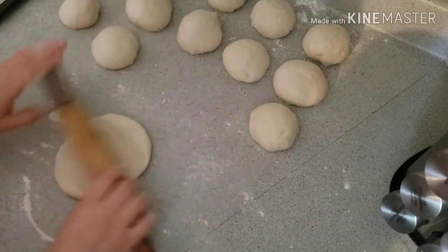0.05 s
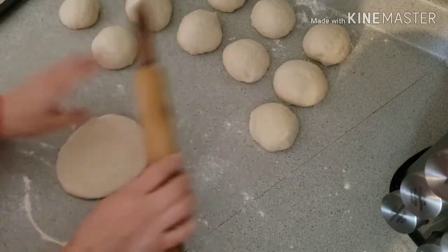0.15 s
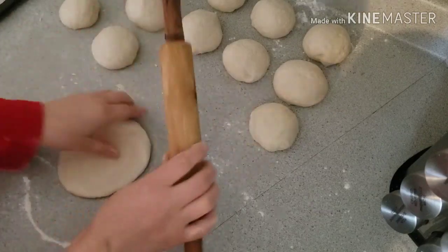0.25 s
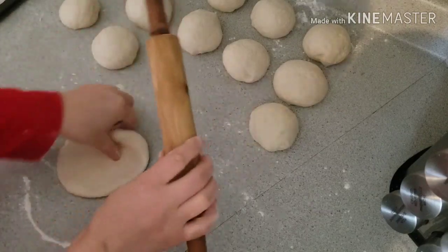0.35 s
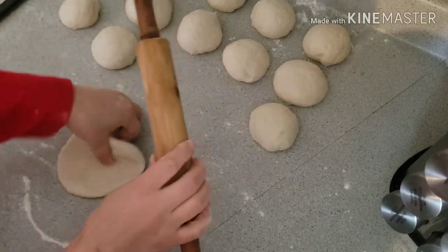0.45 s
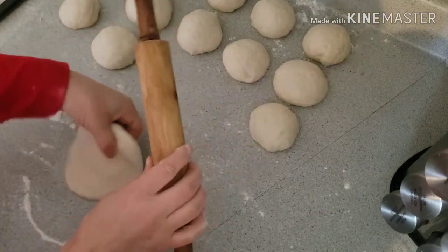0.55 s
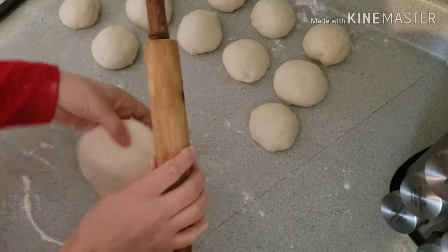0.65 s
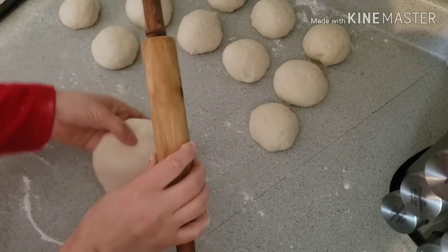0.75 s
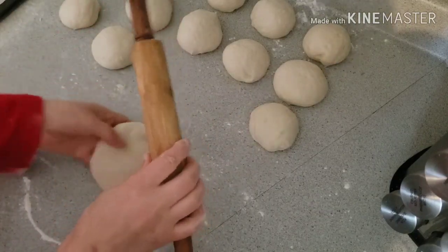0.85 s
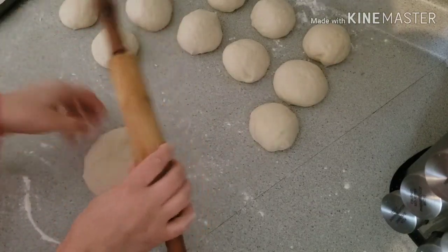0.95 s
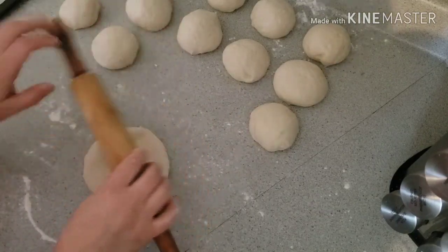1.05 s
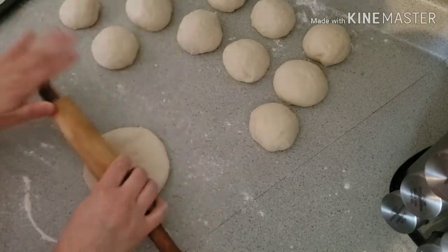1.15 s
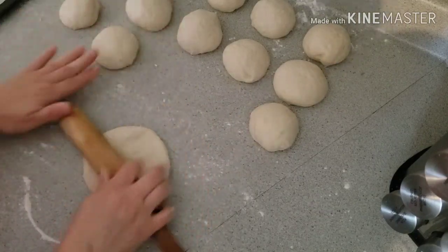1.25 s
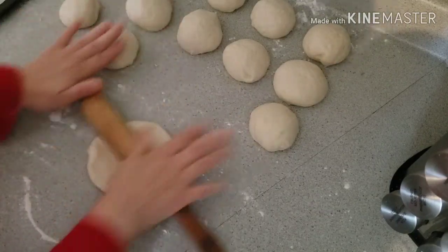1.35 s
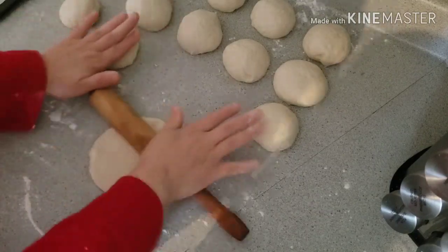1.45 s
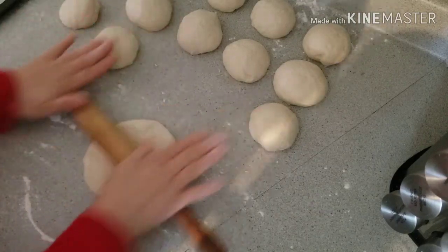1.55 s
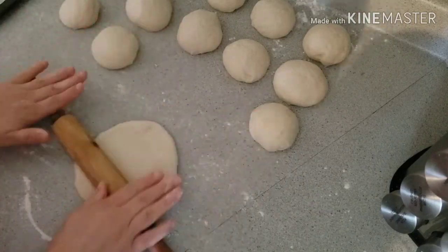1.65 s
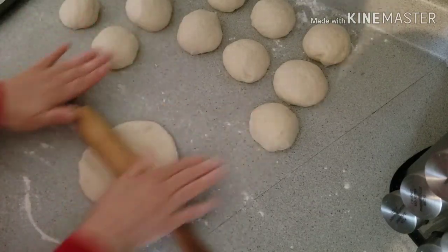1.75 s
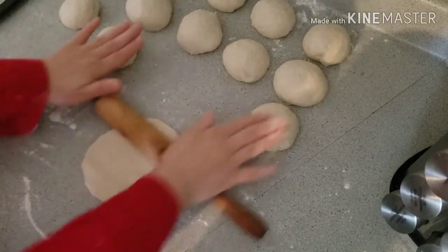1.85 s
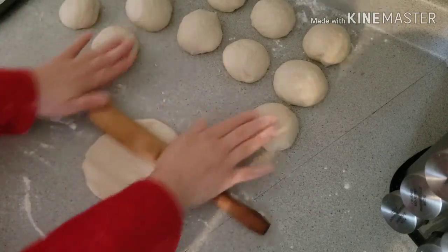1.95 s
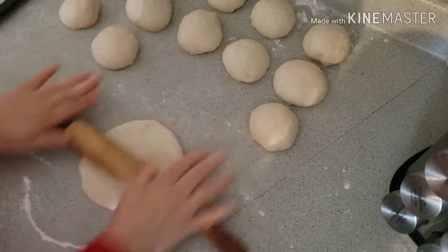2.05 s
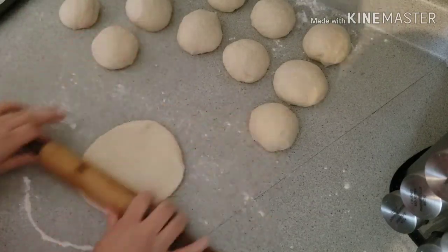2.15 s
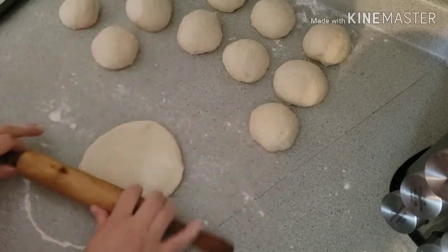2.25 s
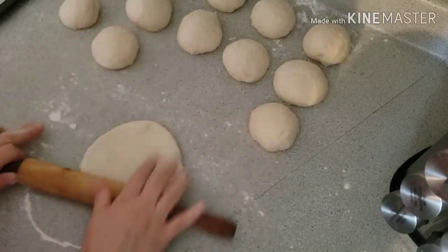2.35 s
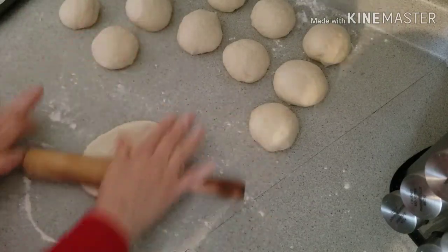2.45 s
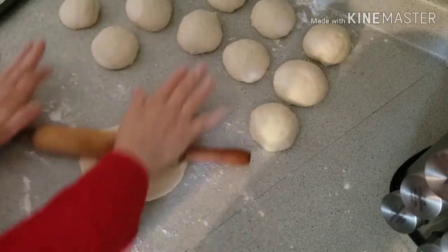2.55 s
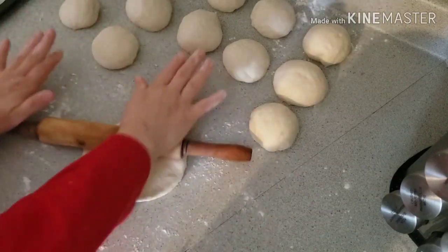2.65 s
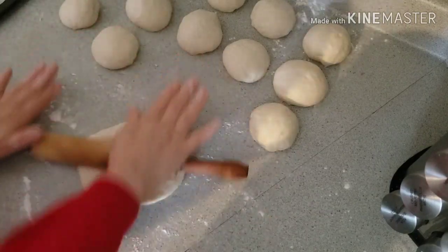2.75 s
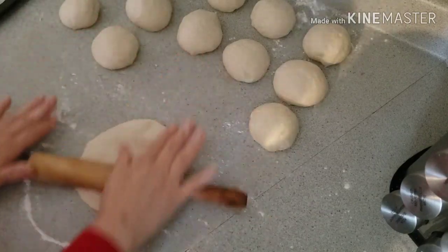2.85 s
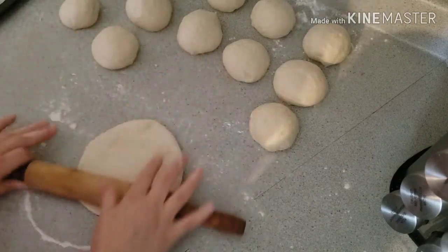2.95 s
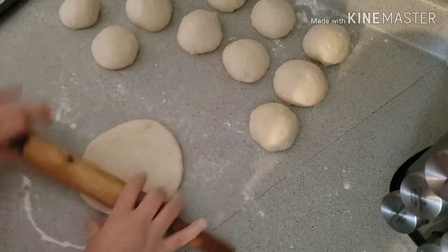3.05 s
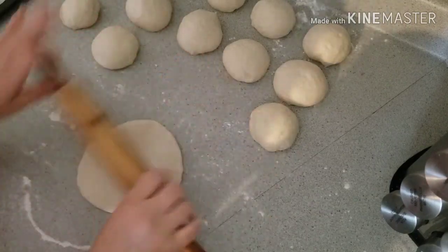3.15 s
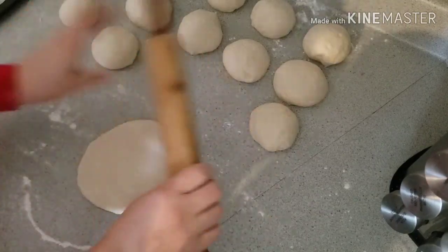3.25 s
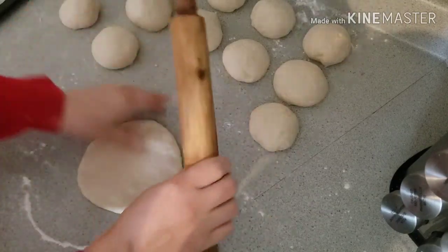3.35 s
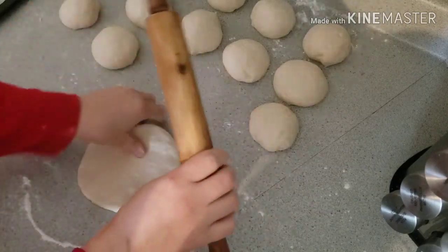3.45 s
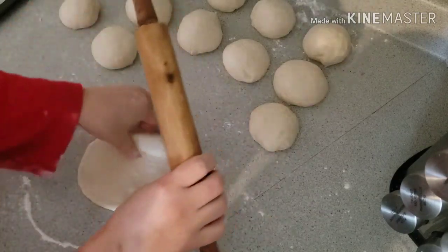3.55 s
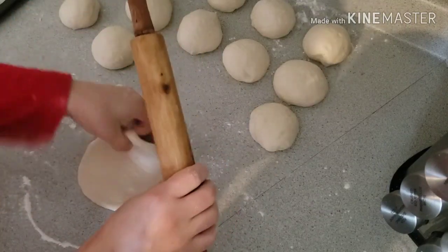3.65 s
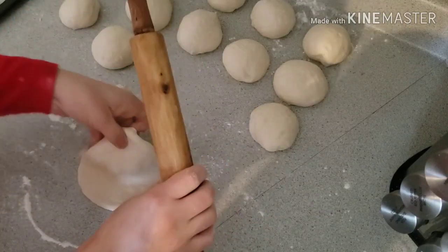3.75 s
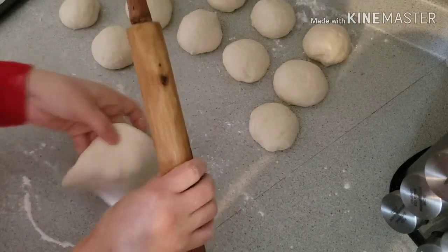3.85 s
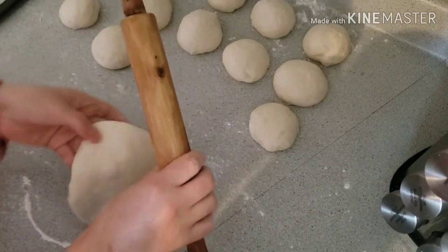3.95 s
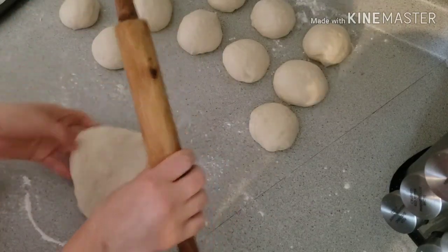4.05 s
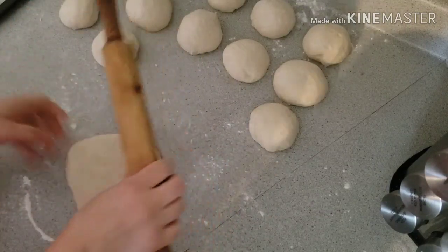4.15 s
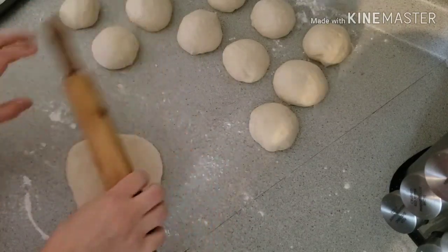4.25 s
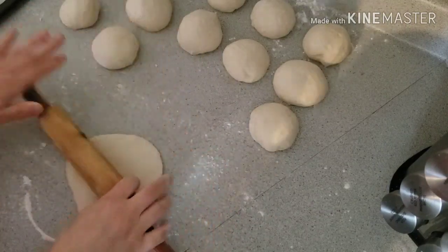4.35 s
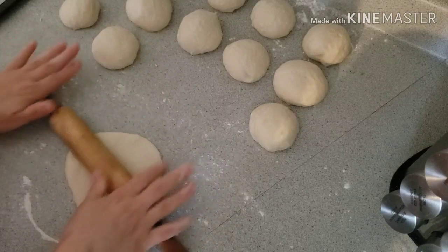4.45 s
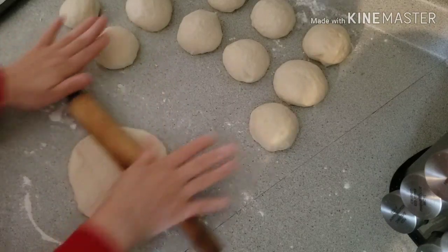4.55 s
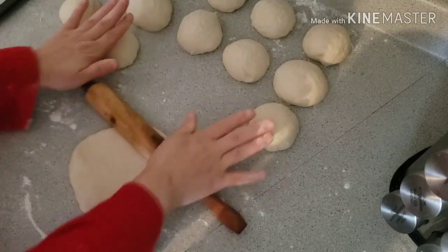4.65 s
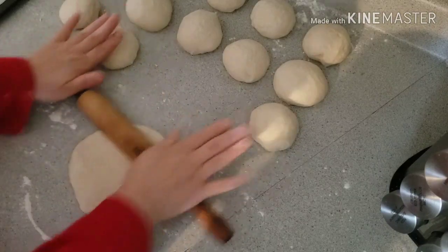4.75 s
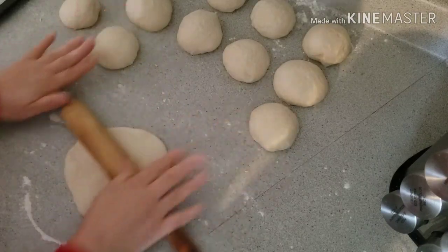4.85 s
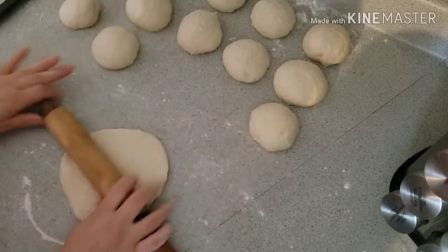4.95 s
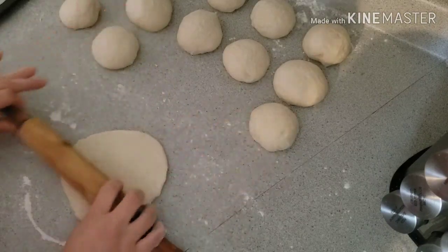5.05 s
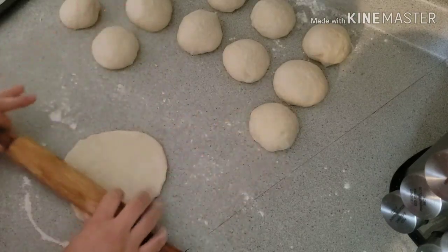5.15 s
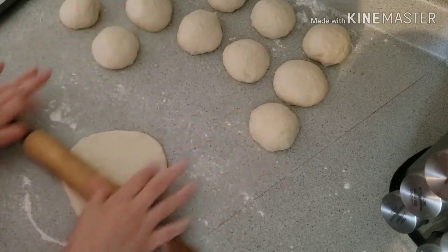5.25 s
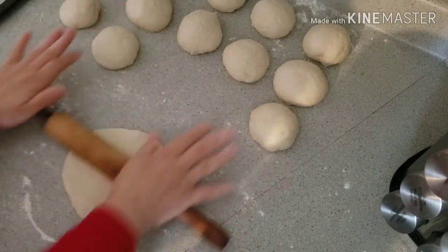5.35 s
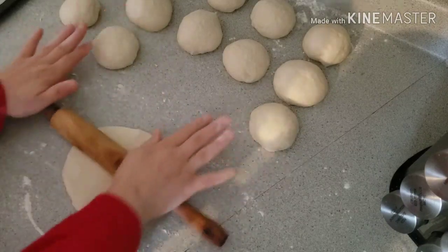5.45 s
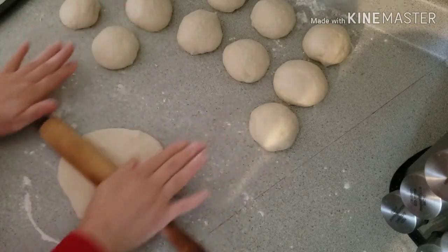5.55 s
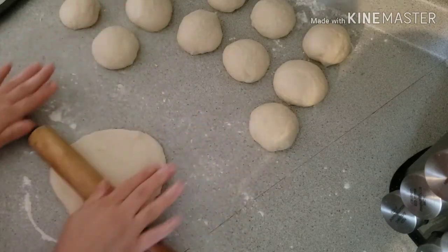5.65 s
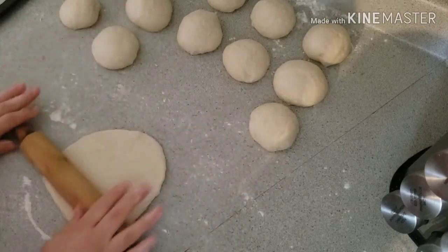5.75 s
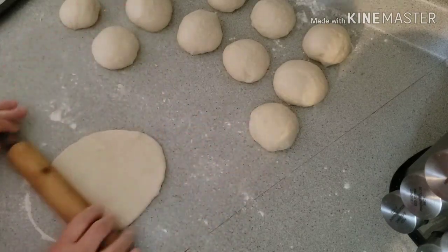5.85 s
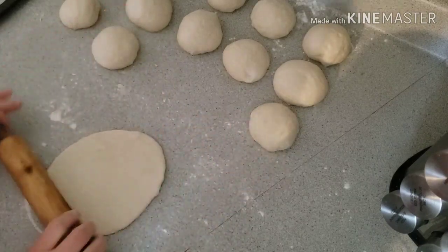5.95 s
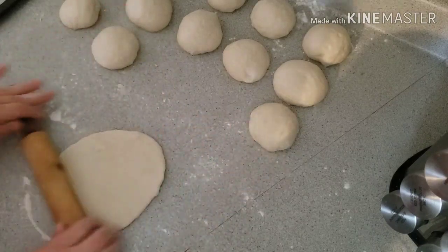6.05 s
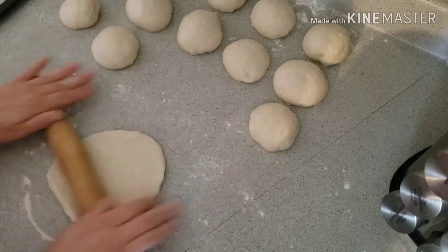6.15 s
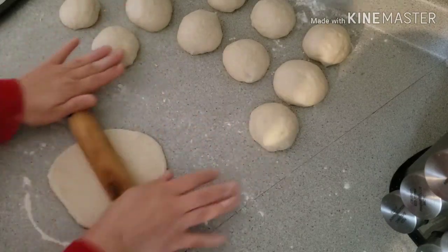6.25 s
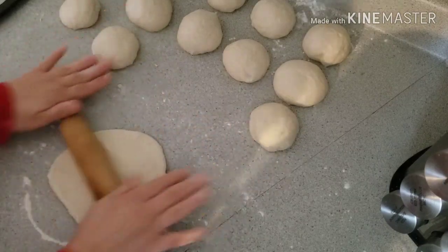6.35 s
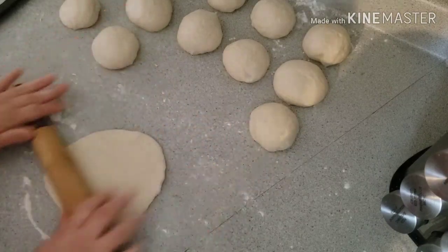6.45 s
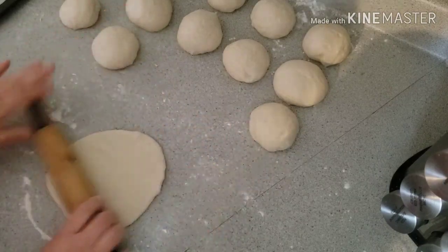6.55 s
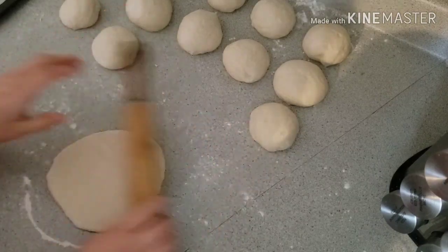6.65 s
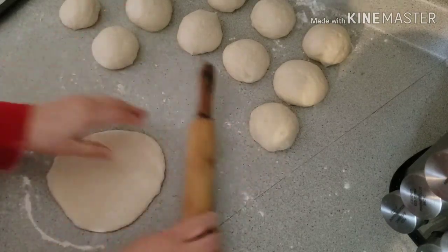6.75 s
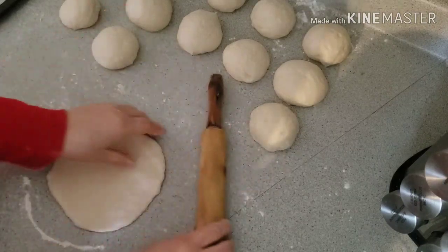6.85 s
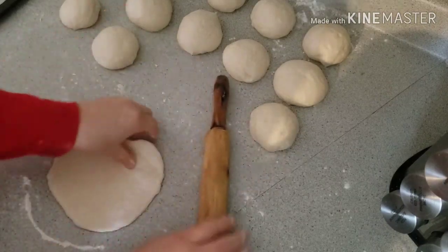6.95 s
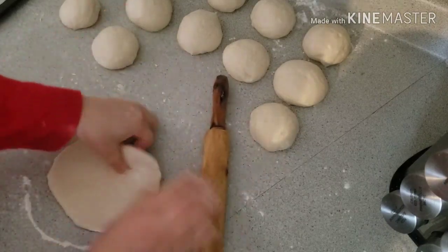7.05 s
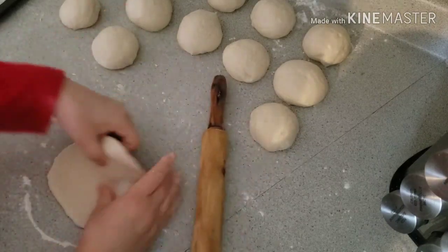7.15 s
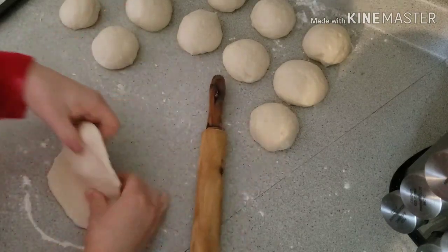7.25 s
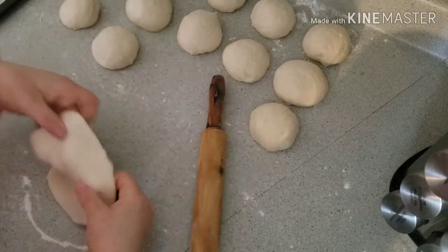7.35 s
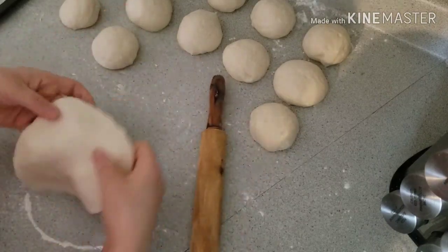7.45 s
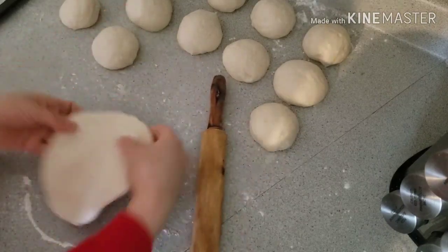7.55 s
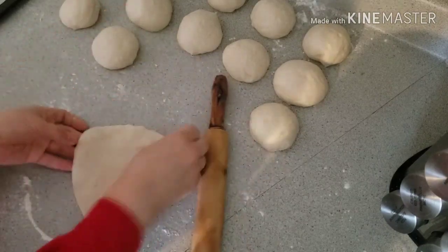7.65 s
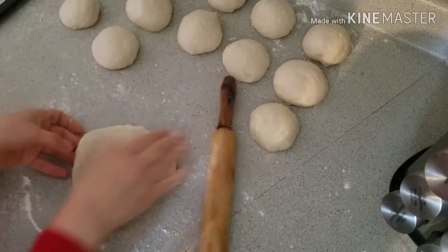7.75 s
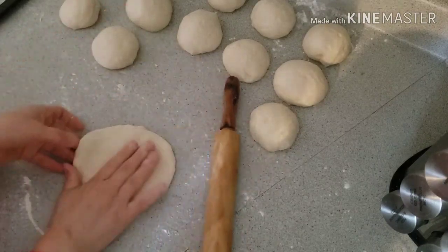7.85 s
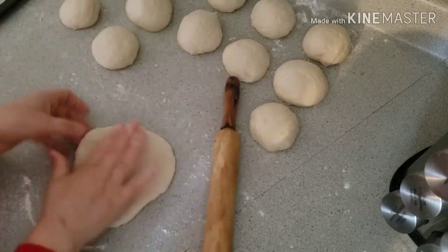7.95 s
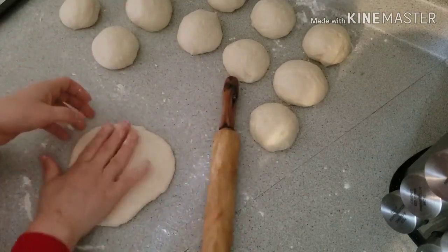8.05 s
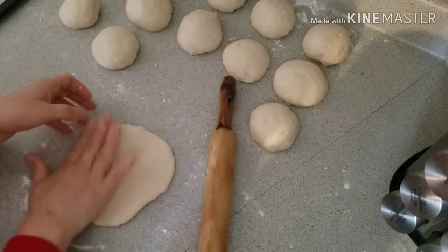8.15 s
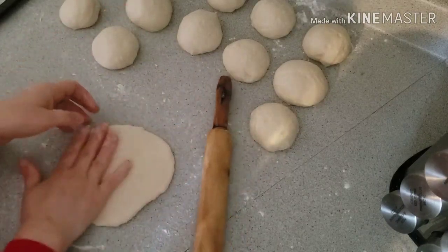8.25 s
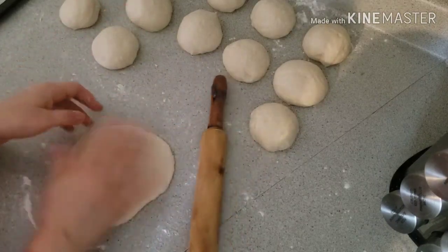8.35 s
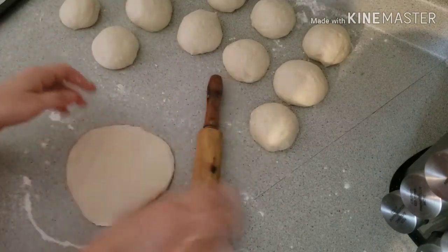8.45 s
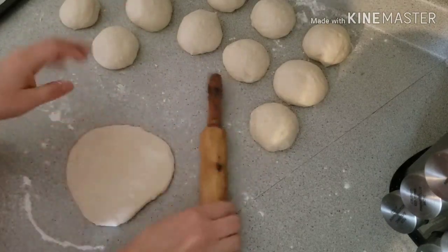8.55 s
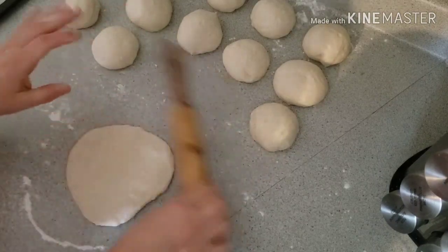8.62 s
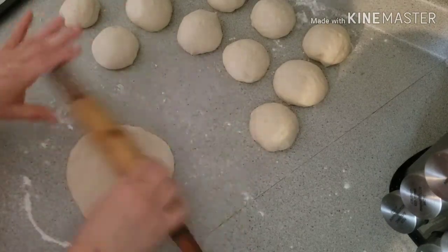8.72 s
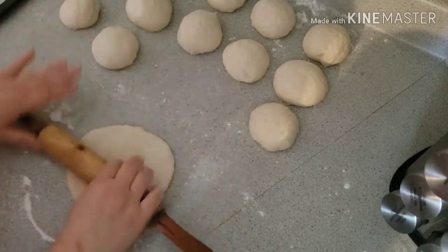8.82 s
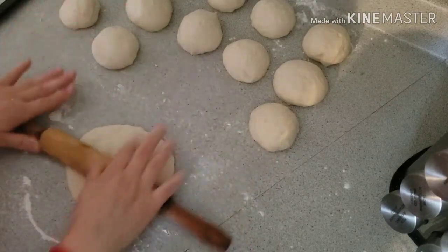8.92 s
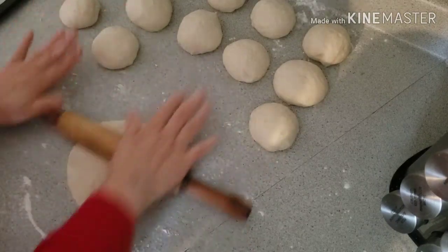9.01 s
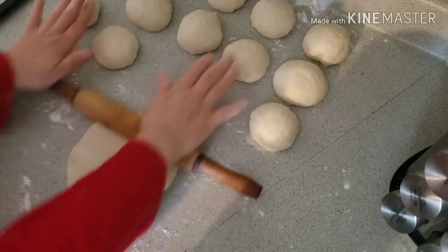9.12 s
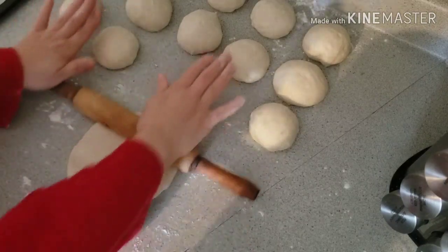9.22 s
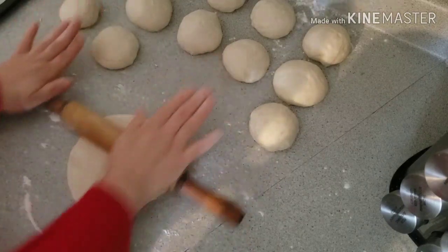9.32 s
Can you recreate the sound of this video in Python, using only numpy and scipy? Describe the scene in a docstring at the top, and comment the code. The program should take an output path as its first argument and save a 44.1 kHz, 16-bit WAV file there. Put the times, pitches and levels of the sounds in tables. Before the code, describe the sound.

Close rubbing strokes, handle clacks and knocks of a rolling pin on dough, with palms patting, as a background hum clunks off.

```python
"""A wooden rolling pin swishes over dough, close up, a handle clacking as it sets off.
On each stroke palms brush the pin, wood rubs on wood and the barrel rumbles over flour.
Hands pat and sweep the dough, and the barrel knocks the worktop into ringing, hardest near the end.
Behind it a kitchen appliance hums, clunks off about two seconds in and runs down."""
import sys
import numpy as np
from scipy import signal
from scipy.fft import rfft, irfft, next_fast_len
from scipy.io import wavfile
from scipy.ndimage import uniform_filter1d

SR = 44100
rng = np.random.default_rng(int(sys.argv[2]) if len(sys.argv) > 2 else 0)


def dump_mix(stems):
    """Bounce the given channels to the path in sys.argv[1] as a 16-bit WAV at rate SR."""
    frames = np.atleast_2d(stems).T  # one column per channel
    limited = np.clip(frames, -1, 1)  # hard clip at full scale
    pcm = np.round(limited * 32767).astype(np.int16)
    wavfile.write(sys.argv[1], SR, pcm)


N = 413642
TIME = np.arange(N) / SR
HIT_SAMPLES = 32768
HZ = np.fft.rfftfreq(HIT_SAMPLES, 1 / SR) + 1e-3  # frequency axis of one hit
AGE = np.arange(HIT_SAMPLES) / SR  # seconds into one hit


# Pushes and pulls of the pin: start_s, length_s, peak_fraction, palms_db, rub_db, rumble_db
PIN_STROKES = [(0.0, 0.17, 0.28, -54.5, -58.5, -61), (1.30, 0.28, 0.6, -60.5, -65, -60),
               (1.59, 0.2, 0.59, -61, -70.5, -65), (1.80, 0.21, 0.48, -61, -63, -66),
               (2.05, 0.16, .7, -62.5, -70.5, -78), (2.18, 0.17, 0.34, -59, -60, -62),
               (2.46, 0.29, .4, -68, -72, -65), (2.80, 0.32, 0.66, -62.5, -71, -70),
               (3.02, 0.16, 0.24, -57, -54, -57), (3.16, 0.18, 0.33, -55, -60, -66),
               (4.48, 0.14, 0.12, -59.5, -52, -77), (4.56, .23, 0.48, -65, -67.5, -77),
               (4.84, 0.22, 0.95, -60.5, -66, -73.5), (5.02, .17, 0.96, -51.5, -52.5, -74),
               (5.17, .17, 0.51, -55.5, -49, -71), (5.32, 0.19, 0.35, -68.5, -67, -69),
               (5.60, 0.14, 0.67, -66.5, -69.5, -80), (5.72, .16, 0.38, -56.5, -58, -63),
               (5.84, .26, 0.34, -64, -69.5, -71), (6.09, 0.31, 0.47, -62, -66.5, -74),
               (6.44, 0.23, 0.29, -60, -65, -92), (9.03, .23, 0.35, -60, -62.5, -73)]
# Hands and dough sliding on the floured worktop: start_s, length_s, peak_fraction, skin_db, scrape_db
HAND_SWEEPS = [(0.328, 0.099, 0.5, -59, -59), (0.408, .17, 0.13, -81, -68),
               (0.588, 0.17, 0.31, -65.5, -68.5), (0.92, 0.16, .52, -61, -62.5),
               (3.489, 0.073, 0.27, -58.5, -61.5), (3.554, 0.16, 0.28, -67, -73),
               (3.778, 0.2, 0.44, -73, -90), (7.256, .32, 0.64, -66.5, -75),
               (7.646, 0.14, 0.61, -62.5, -69), (8.135, 0.092, 0.84, -72, -68),
               (8.317, 0.15, .55, -72.5, -83), (8.586, 0.071, 0.39, -57.5, -49.5),
               (8.925, 0.077, .5, -57.5, -59)]
# Hiss of brushing skin: freq_hz, gain_db
SKIN_EQ = [(500, -10.5), (2000, -16), (3000, -13), (3800, -13.5), (5500, -3.5), (7000, -0.5), (9000, -6.5),
           (12000, -4), (16000, -4)]
# Rasp of wood on wood: freq_hz, gain_db
RUB_EQ = [(500, -17.5), (1200, -8), (1850, -2), (2400, -1.5), (2950, 7), (3200, 2), (3700, -4), (4600, 0.5),
          (5500, -6.5), (7200, 1), (8500, -19), (16000, -16)]
# Low roll of the barrel: freq_hz, gain_db
RUMBLE_EQ = [(30, -27.5), (80, -2.5), (200, 13.5), (550, 15), (900, 3.5), (1700, 1.5), (2600, -26.5),
             (6000, -59)]

def rolling():
    """Palms brush, wood rubs and the barrel rumbles, all following the uneven pressure of the hands."""
    # a sweep rumbles the worktop 8 dB under its scrape
    strokes = list(PIN_STROKES) + [(*sweep, sweep[-1] - 8) for sweep in HAND_SWEEPS]
    # hands never keep quite still, so each layer has a floor
    brush = friction([(*motion, db) for *motion, db, _, _ in strokes], floor_db=-78)
    press = friction([(*motion, db) for *motion, _, db, _ in strokes], floor_db=-79)
    roll = friction([(*motion, db) for *motion, _, _, db in strokes], floor_db=-80.5)
    grip = waver(rate_hz=35)
    grains = unit(amp(2.5 * waver(900) + 1.2 * waver(70)))
    flour = grains + amp(-11) * flour_crackles()
    skin = noise(SKIN_EQ) * brush * amp(2 + 1.3 * grip)
    skin *= unit(amp(.3 * waver(600)))  # flour makes the palms gritty
    rub = noise(RUB_EQ) * press * flour * amp(-3.5 + .5 * grip)
    rumble = noise(RUMBLE_EQ) * roll * amp(-1.3 + 1.1 * grip)
    return skin + rub + rumble


def friction(strokes, floor_db, ends_db=-14, linger_db=-5.5, linger_t60_s=.18):
    """Rubbing envelope: swells as the hand speeds up, falls as it slows, then lingers in the room."""
    power = np.zeros((1, N))
    for start_s, length_s, peak, db in strokes:
        progress = np.arange(-length_s, 2 * length_s, 1 / SR) / length_s
        peak = np.clip(peak, .05, .95)
        from_peak = np.maximum((peak - progress) / peak, (progress - peak) / (1 - peak))
        arch = amp(db + ends_db * from_peak ** 2.23)
        before_zero = max(round((length_s - start_s) * SR), 0)
        add(power, start_s - length_s, arch[None, before_zero:] ** 2)
    decay = np.exp(-np.log(1e6) / (linger_t60_s * SR))
    lingering = signal.lfilter([1 - decay], [1, -decay], power + 1e-30)
    return np.sqrt(power + amp(linger_db) ** 2 * lingering + amp(floor_db) ** 2)


def flour_crackles(per_s=45, decay_s=.001, spread_db=4.5):
    """Envelope of flour lumps crushed under the pin: sparse, tiny snaps of uneven size."""
    sizes = amp(spread_db * np.minimum(rng.exponential(1, N), 4))
    snaps = sizes * (rng.random(N) < per_s / SR)
    return unit(signal.lfilter([1], [1, -np.exp(-1 / (decay_s * SR))], snaps + 1e-20))


# The barrel landing: start_s, crack_db, cutoff_hz, thud_db, thud_hz
KNOCK_HITS = [(3.050, -47.5, 1500, -49, 139), (4.178, -33.5, 1230, -40, 112),
              (4.186, -43.5, 2600, -39.5, 115), (4.498, -41, 808, -43, 110), (5.289, -43, 2030, -41.5, 78),
              (6.151, -47.5, 740, -44, 86), (6.921, -21.5, 1460, -45, 149.4),
              (6.9242, -37, 1100, -23.5, 164), (6.9583, -21.5, 1027, -23.5, 232),
              (6.964, -27, 693, -24, 174), (7.056, -34, 810, -44, 201), (7.779, -45.5, 655, -33.5, 181),
              (8.9613, -19, 2320, -29.5, 113), (8.968, -33.5, 1000, -38, 310), (9.176, -48, 900, -45, 120)]
# Resonances of the worktop: pitch_hz, boost_db, t60_s
WORKTOP_MODES = [(70.5, 10, 0.37), (110.2, -1, 0.085), (127.1, 5, 0.22), (192, -1, 0.17), (229.3, 5, 0.43),
                 (329, 0.5, 0.52), (370.6, 7, 0.16), (401.3, 1, .2), (555, 7, 0.086), (727, 7, 0.015),
                 (747, -3.5, .2), (854, -5, 0.12), (1026, 1.5, 0.089), (1300, -3.5, 0.2), (1450, 0.5, 0.28),
                 (2040, -8, .12), (2630, -2.5, .08)]
# Tone of the crack: freq_hz, gain_db
KNOCK_EQ = [(30, -54.5), (100, -15.5), (250, -4.5), (400, -6.5), (520, -7.5), (800, -5.5), (1300, -0.5),
            (2200, 0), (3500, -4.5), (7500, -4), (9500, -23), (16000, -31)]

def barrel_knocks():
    """The barrel lands with a crack and a thud that ring the worktop; harder contact is brighter."""
    out, worktop = np.zeros((2, N)), ringing(WORKTOP_MODES)
    for start_s, crack_db, cutoff_hz, thud_db, thud_hz in KNOCK_HITS:
        contact = causal(amp(read(KNOCK_EQ, HZ)) * (blow(cutoff_hz) + amp(-30.5)))
        crack = amp(crack_db) * unit(worktop * contact)
        weight = amp(thud_db) * unit(worktop * thud(thud_hz))
        add(out, start_s, kitchen(crack + weight, near_db=-1.5, far_db=0, lag_samples=7.5))
    return out * amp([[-.7], [.7]])


# Handles hitting the barrel: start_s, handle_db, ring_hz, body_db
CLACK_HITS = [(0.094, -46, 3000, -52.5), (1.139, -58, 2860, -63), (1.333, -63.5, 3060, -78),
              (2.432, -40, 3080, -59), (2.436, -29.5, 3150, -34.5), (3.049, -45.5, 3170, -50.5),
              (3.26, -32, 2874, -43.5), (4.179, -43, 2450, -46), (4.505, -40.5, 2960, -48.5),
              (5.122, -50.5, 2950, -57.5), (5.147, -47, 2930, -52), (5.2867, -34.5, 3040, -38),
              (5.402, -51, 2880, -57), (5.776, -51.5, 2970, -68), (6.147, -52, 2930, -58),
              (6.459, -59, 3090, -77), (6.597, -55.5, 2990, -55), (6.745, -59, 7340, -66),
              (6.93, -37, 2940, -38.5), (7.049, -46.5, 3040, -43.5), (8.835, -41.5, 7200, -50.5)]
# Hollow resonances of the barrel: pitch_hz, boost_db, t60_s
BARREL_MODES = [(570, -4.5, 0.05), (1350, -2.5, 0.0082), (1716, 3.5, 0.028), (2260, -5, 0.036)]
# Dull body of the barrel: freq_hz, gain_db
BARREL_EQ = [(40, -42.5), (220, -9), (550, 0), (900, -5), (1700, -2), (2500, -2), (3800, -40.5),
             (16000, -46)]
# High resonances of a handle: pitch_hz, boost_db, t60_s
HANDLE_MODES = [(4330, 2.13, 0.03), (5130, 0.83, 0.077), (5640, 0.92, 0.06), (6960, 2.3, 0.023)]
# Bright snap of a handle: freq_hz, gain_db
HANDLE_EQ = [(100, -36), (1500, -10), (2500, -4.5), (3100, -1), (3700, -7), (4400, -2.5), (6000, 2),
             (7200, 0), (8500, -11), (10500, -19.5), (16000, -30.5)]

def handle_clacks():
    """A handle snaps against the barrel: a bright ring over hollow wood."""
    out = np.zeros((2, N))
    body = unit(ringing(BARREL_MODES) * causal(amp(read(BARREL_EQ, HZ))))
    snap = ringing(HANDLE_MODES) * causal(amp(read(HANDLE_EQ, HZ)))
    for start_s, handle_db, ring_hz, body_db in CLACK_HITS:
        loose_db = -.12 * (handle_db + 34)  # a light tap leaves the handle loose to ring more clearly
        ring = ringing([(ring_hz, 13.5 + loose_db, .024), (ring_hz * 1.45, .5 + loose_db, .025)])
        clack = amp(handle_db) * unit(snap * ring) + amp(body_db) * body
        add(out, start_s, kitchen(clack, near_db=7, far_db=3, lag_samples=6.5, near_s=.0053))
    return out * amp([[-3.5], [-.5]])


# Hands and dough landing: start_s, thud_db, thud_hz, slap_db, slap_hz, slap_length_s
PAT_HITS = [(0.328, -35.5, 138, -71, 1500, .037), (0.441, -64, 148, -49, 3830, 0.017),
            (0.546, -47, 220, -49, 446, 0.021), (0.924, -47.5, 132, -50, 1930, 0.098),
            (1.137, -52, 169, -50, 9000, .008), (1.332, -48, 110, -55, 5000, 0.0088),
            (2.442, -41, 110, -37.5, 1970, 0.0086), (3.459, -41, 135, -72, 340, .012),
            (3.479, -41, 147, -72, 350, 0.013), (3.563, -38.5, 151, -54, 400, 0.013),
            (3.585, -52, 164, -45, 1820, .007), (3.674, -47, 144, -49, 880, 0.083),
            (3.708, -54, 150, -48.5, 1080, .02), (3.748, -52, 140, -45.5, 990, .015),
            (4.172, -49, 109.6, -40.5, 6940, 0.025), (4.53, -44, 126, -48, 800, 0.011),
            (5.784, -53, 270, -70, 594, 0.022), (5.818, -44, 124, -64, 400, .024),
            (6.156, -44, 84.6, -51.5, 700, 0.011), (7.039, -24, 164, -35.5, 400, 0.0021),
            (7.709, -41, 153, -30.5, 1300, 0.011), (7.755, -38, 150, -52, 860, 0.02),
            (7.929, -30, 131, -36, 680, 0.0073), (8.098, -56, 131, -36.5, 2930, 0.0033),
            (8.104, -33, 88, -39.5, 580, 0.0029), (8.271, -32.5, 116, -45, 1960, .0072),
            (8.596, -29, 121, -38, 450, 0.029), (8.613, -38.5, 136, -46, 7900, 0.011),
            (9.194, -40.5, 128, -57, 800, .0065)]
# Top end of the slap: freq_hz, gain_db
SLAP_EQ = [(2000, 5.5), (4000, 0.5), (7500, 7), (8800, -1.5), (12000, 0.5), (16000, -2)]

def dough_pats(sink_s=.002):
    """Flesh on dough: a slap of many tiny contacts as air is squeezed out, then the weight thuds in."""
    out, worktop = np.zeros((2, N)), ringing(WORKTOP_MODES)
    treble = amp(read(SLAP_EQ, HZ))
    for start_s, thud_db, thud_hz, slap_db, slap_hz, length_s in PAT_HITS:
        band = (HZ / slap_hz) / (1 + (HZ / slap_hz) ** 2)
        slap = amp(slap_db - 16) * unit(causal(treble * band))  # held low: the scatter carries it
        add(out, start_s, kitchen(slap, near_db=13.5, far_db=12.5, near_s=length_s * .88))
        weight = amp(thud_db) * unit(worktop * thud(thud_hz))
        add(out, start_s + sink_s, kitchen(weight, near_db=-5.5, far_db=-.5))
    return out * amp([[1], [2]])


# The sleeve's drag: start_s, length_s, peak_fraction, level_db
SLEEVE_STROKES = [(4.56, 0.4, 0.17, -66.5)]
# Swish of cloth: freq_hz, gain_db
SLEEVE_EQ = [(800, -27), (2000, -6), (2500, 5), (3400, -12), (4400, 1), (5000, 5.5), (5700, -11),
             (9000, -23), (16000, -18)]

def sleeve():
    """A sleeve drags along on one push."""
    return noise(SLEEVE_EQ) * friction(SLEEVE_STROKES, floor_db=-np.inf)


# The running motor: time_s, pitch_hz
MOTOR_CURVE = [(0, 166.6), (.7, 172.4), (1.4, 172.7), (1.85, 166.9)]
# Partials of its hum: pitch_ratio, level_db
HUM_PARTIALS = [(.69, -9.5), (1, -3), (1.75, -24.5), (2.721, -16)]
# The air it moves: freq_hz, gain_db
DRAUGHT_EQ = [(18, -43), (30, -23.5), (53, -8), (134, -17), (171, -1.5), (252, -15), (303, -10.5),
              (431, -17.5), (464, -20), (500, -19), (871, -24), (973, -29), (2500, -48), (3250, -62),
              (5500, -120)]

def appliance_hum(off_s=1.937, fade_db_per_s=33.5, sag_hz_per_s=19):
    """A motor's wavering hum in moving air; once switched off it fades and slows."""
    coasting_s = np.maximum(TIME - off_s, 0)
    running_hz = np.interp(TIME, *np.transpose(MOTOR_CURVE))
    pitch_hz = np.maximum(running_hz - sag_hz_per_s * coasting_s, 0)
    hum = 0
    for ratio, db in HUM_PARTIALS:
        sway = amp(2.6 * waver(6))
        drift = 1 + .02 * waver(10)
        phase = 2 * np.pi * np.cumsum(ratio * pitch_hz * drift) / SR
        hum += amp(db) * sway * np.sqrt(2) * np.sin(phase)
    return amp(-52.5 - fade_db_per_s * coasting_s) * (amp(.5) * hum + noise(DRAUGHT_EQ))


# The switch-off clunk: start_s, level_db, cutoff_hz
CLUNK_HITS = [(1.836, -45, 1605), (1.849, -48.5, 1770), (1.859, -58.5, 910), (1.870, -49, 1700),
              (1.884, -60.5, 3200)]
# Resonances of the casing: pitch_hz, boost_db, t60_s
CASING_MODES = [(260, 14, 0.13), (1077, 3, 0.16), (1330, 10, 0.056), (1600, 6.4, 0.064)]

def appliance_clunk():
    """Quick blows ring the casing across the room, heard mostly as reflections."""
    out, low_cut = np.zeros((2, N)), HZ / (HZ + 200)
    for start_s, db, cutoff_hz in CLUNK_HITS:
        casing = unit(ringing(CASING_MODES) * causal(blow(cutoff_hz, order=11) * low_cut))
        add(out, start_s, kitchen(amp(db) * casing, near_db=8, far_db=7.5))
    return out


# Still kitchen air: freq_hz, gain_db
AIR_EQ = [(18, -8.5), (35, 7), (50, 12), (90, 12.5), (160, -1), (300, 0.5), (500, -15), (1100, -12),
          (2500, -20), (4000, -32), (6500, -16), (9000, -35.5), (15500, -22.5)]

def room_tone():
    """A faint, bass-heavy bed of still air."""
    return amp(-70.5) * noise(AIR_EQ)


# Reverb time of the kitchen: freq_hz, t60_s
TAIL_DECAY = [(70, 0.59), (200, 0.34), (600, 0.34), (1500, 0.47), (4000, 0.35), (8000, 0.47), (16000, 0.21)]
# Tone of the reverb: freq_hz, gain_db
TAIL_EQ = [(70, -7.5), (200, 1), (600, 4.5), (1500, -3), (4000, 0.5), (8000, -4.5), (16000, 8)]

def kitchen(spectrum, near_db, far_db, lag_samples=0, near_s=.0055, build_s=.0014):
    """One hit as heard: direct sound, scatter from things close by, then the room's tail."""
    delay_samples = (abs(lag_samples) + np.array([[lag_samples], [-lag_samples]])) / 2
    direct = np.exp(-2j * np.pi * HZ / SR * delay_samples)
    echoes = irfft(diffuse(HIT_SAMPLES)[1])
    scatter = echoes[:, ::-1] * np.sqrt(AGE) * np.exp(-AGE / near_s)
    hz, t, bands = signal.stft(echoes, SR, nperseg=512)
    t60 = read(TAIL_DECAY, hz)[:, None]
    bands = bands * amp(read(TAIL_EQ, hz)[:, None] - 60 * t / t60) * np.sqrt(np.log(1e6) / t60 / SR)
    tail = signal.istft(bands, SR)[1][:, :HIT_SAMPLES] * (1 - np.exp(-AGE / build_s))
    room = direct + amp(near_db) * unit(rfft(scatter)) + amp(far_db) * rfft(tail)
    fade = np.minimum(1, 4 * (1 - AGE / AGE[-1])) ** 2
    return irfft(spectrum * room) * fade * np.sqrt(SR / 200)  # hit levels are rms over 5 ms


# Stereo image of the room: freq_hz, left_right_correlation
STEREO_IMAGE = [(30, 0.95), (70, 0.87), (160, 0.92), (300, 0.98), (600, 0.48), (1100, -0.051),
                (2000, -0.061), (5000, -0.062), (16000, 0.037)]

def diffuse(size):
    """Frequencies and stereo spectra of white noise, centred in the bass and wide in the treble."""
    hz = np.fft.rfftfreq(size, 1 / SR)
    mid, side = rfft(rng.standard_normal((2, size)))
    alike = read(STEREO_IMAGE, hz)
    mid, side = mid * np.sqrt((1 + alike) / 2), side * np.sqrt((1 - alike) / 2)
    return hz, np.array([mid + side, mid - side])


def noise(eq):
    """Steady stereo noise through an EQ curve, at rms 1."""
    size = next_fast_len(N)
    hz, white = diffuse(size)
    return unit(irfft(white * amp(read(eq, hz)), size)[:, :N])


def blow(cutoff_hz, order=5.45):
    """Spectrum of a contact force: the shorter the contact, the higher it reaches."""
    return 1 / np.sqrt(1 + (HZ / cutoff_hz) ** (2 * order))


def thud(hz, low_order=2.29):
    """Spectrum of a soft push on the worktop, a cycle or two near hz."""
    return causal(blow(hz * .93, order=2.66) / np.sqrt(1 + (hz / HZ) ** (2 * low_order)))


def ringing(modes):
    """Decaying modes on top of a flat response."""
    return 1 + sum(amp(db) / (1 + 2j * np.pi * (HZ - hz) * t60 / np.log(1000)) for hz, db, t60 in modes)


def causal(gain):
    """Minimum-phase spectrum: the sharpest attack this tone allows."""
    log_gain = np.log(np.maximum(gain / gain.max(), 1e-5))
    mirrored = np.r_[log_gain, log_gain[-2:0:-1]]
    return np.exp(np.conj(signal.hilbert(mirrored)))[:len(HZ)]


def waver(rate_hz):
    """Smooth random modulation at rms 1."""
    knots_s = np.arange(0, N / SR, 1 / (8 * rate_hz))
    smooth = uniform_filter1d(uniform_filter1d(rng.standard_normal(len(knots_s)), 3), 3)
    return unit(np.interp(TIME, knots_s, smooth))


def amp(db):
    """Decibels to gain."""
    return 10 ** (np.asarray(db) / 20)


def unit(x):
    """Scales to rms 1."""
    return x / np.sqrt(np.mean(abs(x) ** 2) + 1e-30)


def read(curve, hz):
    """Reads a curve on a log-frequency axis."""
    points_hz, values = np.transpose(curve)
    return np.interp(np.log(hz + 1), np.log(points_hz + 1), values)


def add(mix, start_s, sound):
    """Mixes a sound in at start_s."""
    part = mix[:, max(round(start_s * SR), 0):][:, :sound.shape[1]]
    part += sound[:, :part.shape[1]]


def scene():
    """Pin and hands up front, the appliance and room tone behind."""
    baking = barrel_knocks() + handle_clacks() + dough_pats() + rolling() + sleeve()
    appliance = (appliance_hum() + appliance_clunk()) * amp([[-.4], [.4]])
    return baking + appliance + room_tone()


def record(dry):
    """A steep low-pass trims the very top."""
    low_pass = signal.firwin(511, 15750, window=("kaiser", 8), fs=SR)
    return signal.oaconvolve(dry, low_pass[None], "same")


dry = scene()
out = record(dry)
dump_mix(out)
```